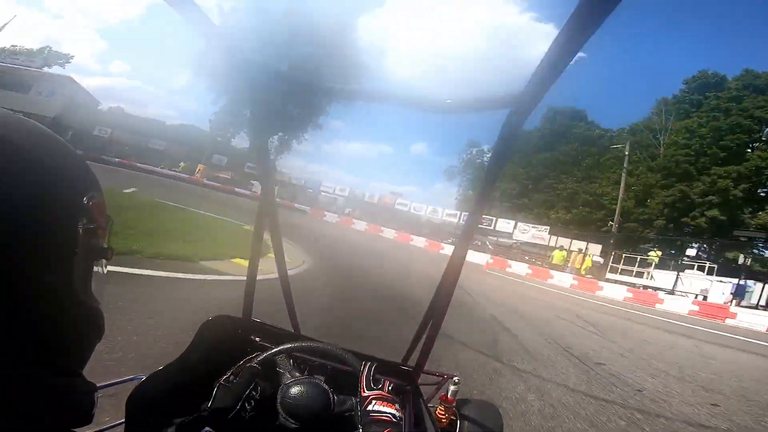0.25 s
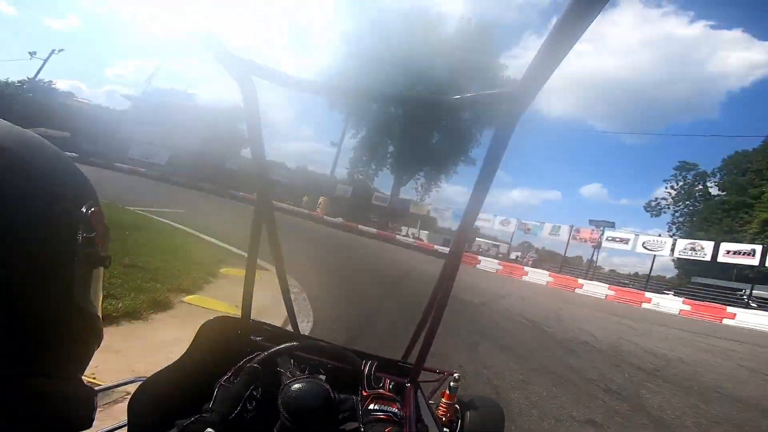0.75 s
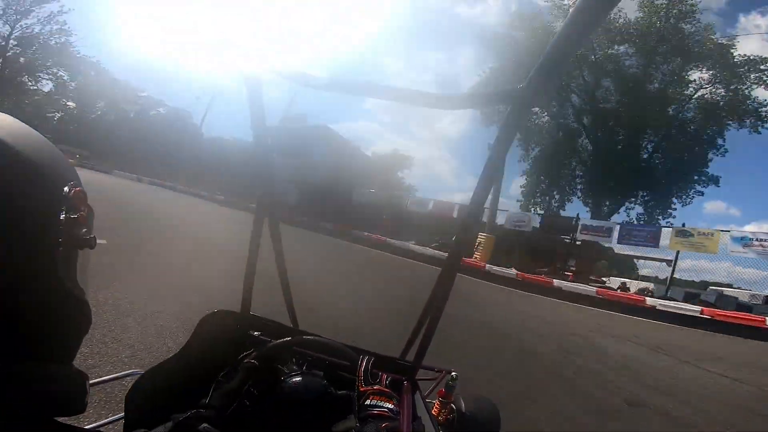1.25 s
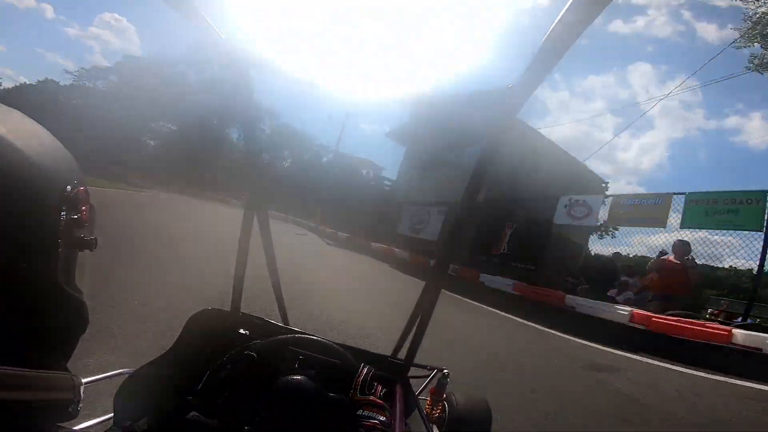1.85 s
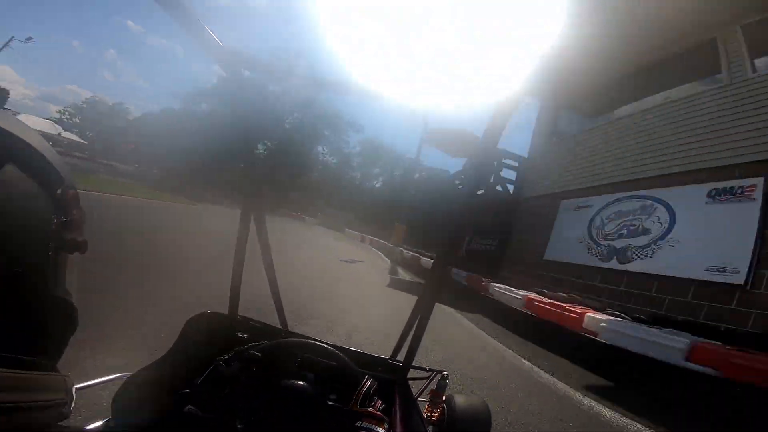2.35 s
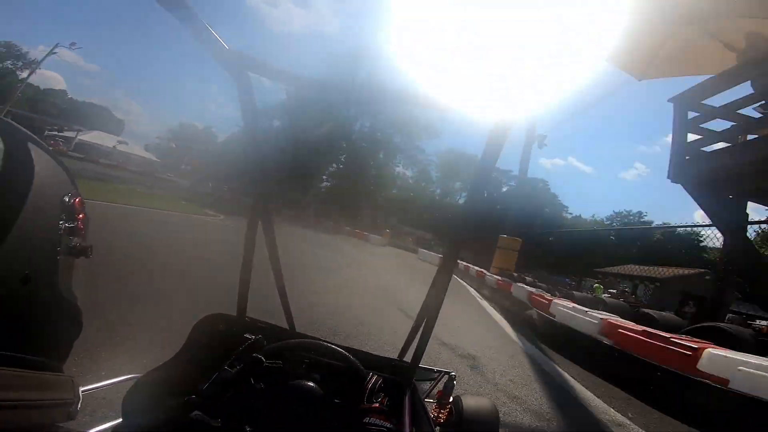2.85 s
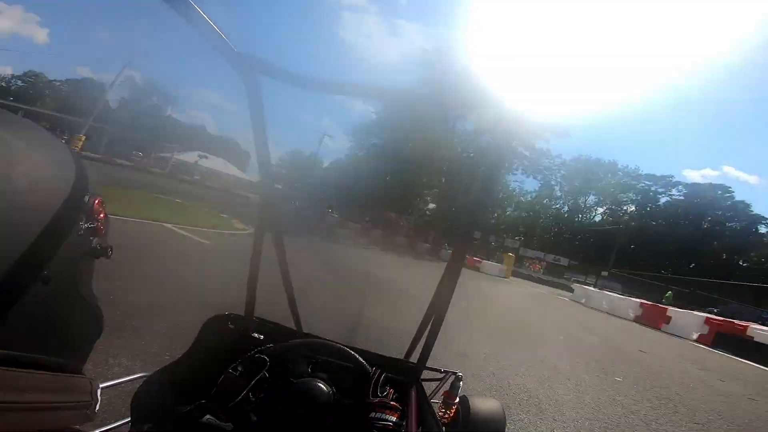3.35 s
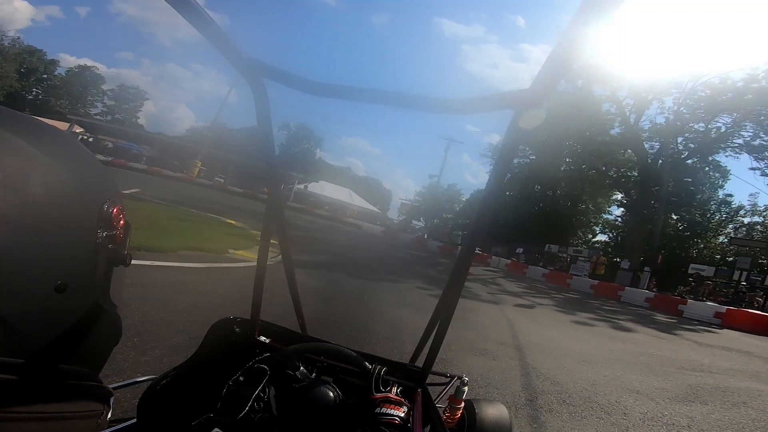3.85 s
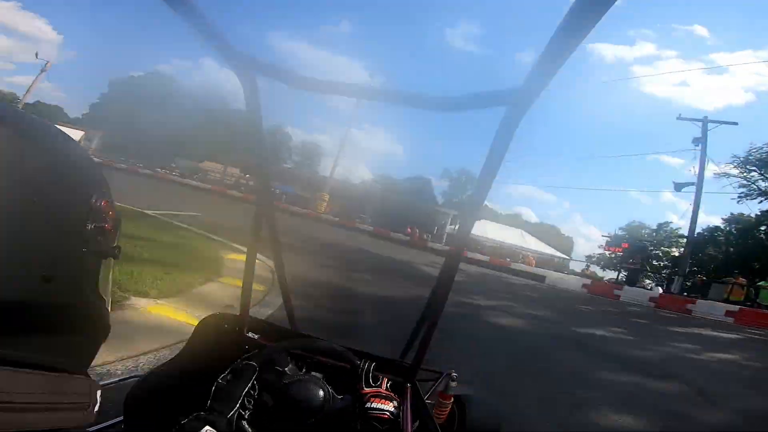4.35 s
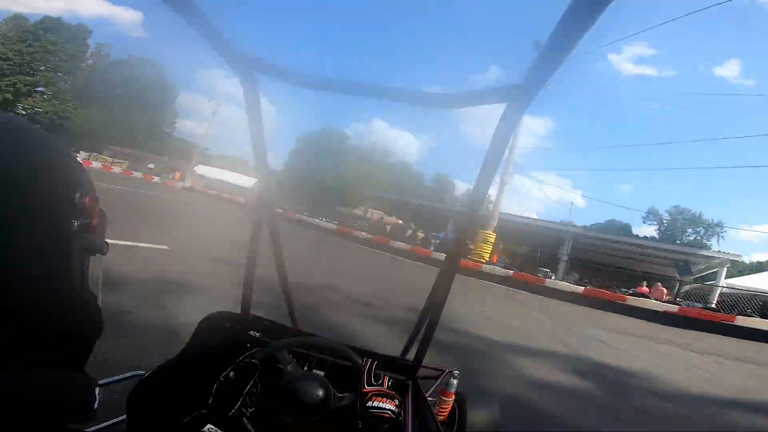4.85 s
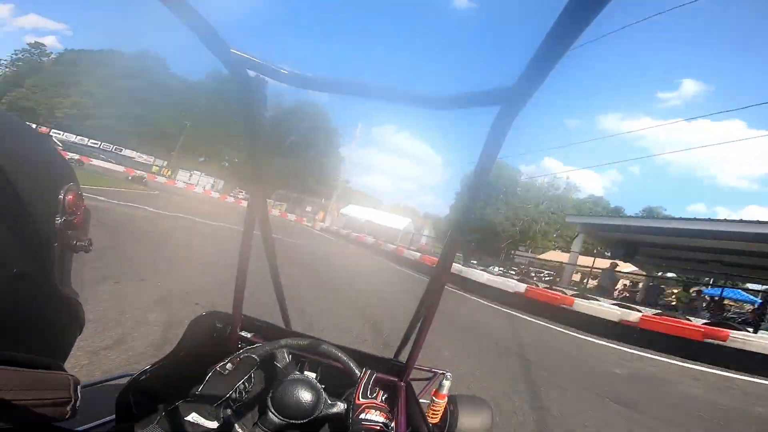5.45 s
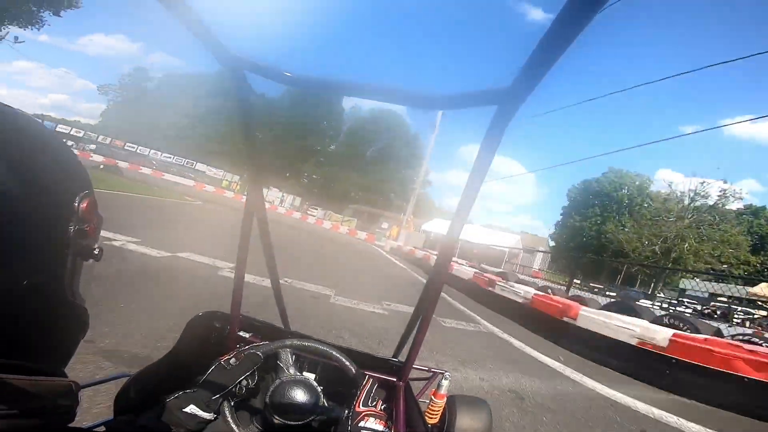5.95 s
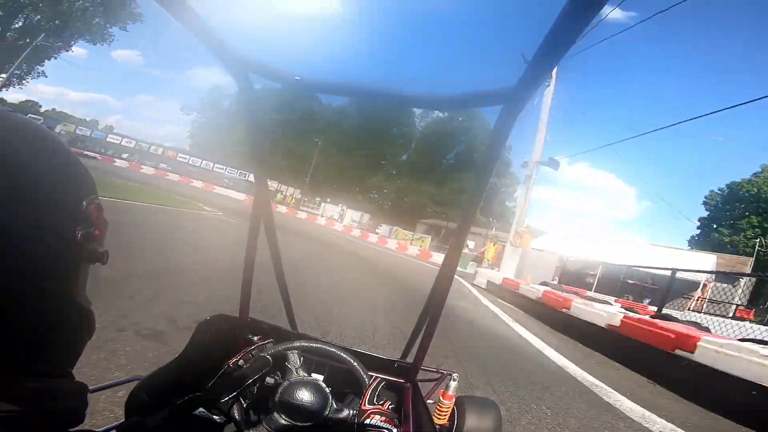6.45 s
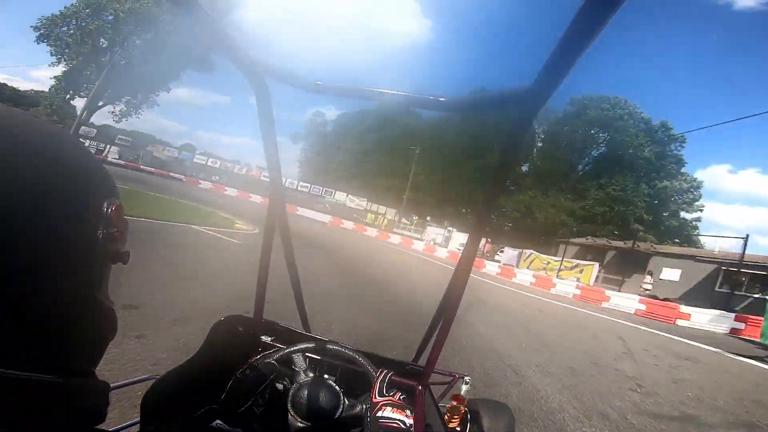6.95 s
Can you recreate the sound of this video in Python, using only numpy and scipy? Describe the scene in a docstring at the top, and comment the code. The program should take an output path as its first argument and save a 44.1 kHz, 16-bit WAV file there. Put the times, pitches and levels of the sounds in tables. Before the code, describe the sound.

A small race car runs flat out around an oval for about seven seconds, heard loud and close from its roll cage. From the first moment the single-cylinder engine makes a deep, booming drone with rapid exhaust cracks. Its pitch is nearly steady, sagging very slightly around 2 and 5.5 seconds and rising a little near 4. The engine surges about six times a second, and each surge swells a metallic clatter of gears, chain and ticking valves. It often stumbles for an instant, sometimes with a pop in the exhaust; the longest stumbles come near 0.7, 3.7, 4.2 and 4.7 seconds. Tiny metallic chirps sit within the engine noise in the first two seconds, and loose metal chatters faintly near 3.8. Wind and tyres rumble underneath, and the engine is still at full speed at the end.

```python
"""On an oval track, at the roll cage of a quarter midget race car lapping flat out.
The four-stroke single booms on its low orders and cracks once a cycle; at top revs it surges
about six times a second. Each surge swells the clatter of valve gear and drive in the metal casing.
In many surges the engine stumbles: a firing fails, and unburnt fuel may pop late in the pipe.
Wind and tyres rumble underneath."""
import sys
import numpy as np
from scipy import signal
from scipy.fft import rfft, irfft
from scipy.io import wavfile

SR = 44100
rng = np.random.default_rng(int(sys.argv[2]) if len(sys.argv) > 2 else 0)


def dump_mix(stems):
    """Bounce the given channels to the path in sys.argv[1] as a 16-bit WAV at rate SR."""
    frames = np.atleast_2d(stems).T  # one column per channel
    limited = np.clip(frames, -1, 1)  # hard clip at full scale
    pcm = np.round(limited * 32767).astype(np.int16)
    wavfile.write(sys.argv[1], SR, pcm)


N = 317961
TIME = np.arange(N) / SR


# low orders of pipe and intake: firing_multiple, rms_db, db_per_firing_hz, db_per_shake_db, flutter_ratio
ENGINE_ORDERS = [(1, -57, 11, 3, 1.2), (2, -14, -0.8, -0.26, 0.17), (3, -25.5, -0.5, -0.5, 0.27),
                 (4, -21, 3, 0.43, 0.31), (5, -36, -3.5, -0.35, 0.45), (6, -50.5, 15.5, 0.5, 1.8),
                 (7, -25, 0.55, 0.68, 0.17), (8, -57.5, 2.5, 0, 6.6), (9, -63, 8.5, 0.8, 7.5),
                 (11, -50, -4, 1.5, 1.1)]
# brief dip of the deep boom: time_s, gain_db
BOOM_DIP = [(4.0, 0), (4.27, -1.5), (4.315, -8), (4.35, -1.5), (4.6, 0)]


def boom(cycles, firing_hz, shake_db, lag_rad=2.042, dispersion_rad=.59, flutter_hz=16):
    """Pipe and intake boom on the low orders; each flutters, and the crank sways as the drive shakes."""
    cycles = cycles - .00021 * shake_db + .0017 * wander(rate_hz=7.4)
    dip_db = along(BOOM_DIP, TIME) + .51 * wander(rate_hz=8.9)
    excess_hz = firing_hz - firing_hz.mean()
    out = np.zeros(N)
    for order, rms_db, db_per_hz, db_per_shake_db, flutter_ratio in ENGINE_ORDERS:
        flutter = 1 + flutter_ratio * (wander(flutter_hz) + 1j * wander(flutter_hz)) / np.sqrt(2)
        phase_rad = 2 * np.pi * order * cycles - lag_rad * order + dispersion_rad * order ** 2
        level_db = rms_db + db_per_hz * excess_hz + db_per_shake_db * shake_db
        if order == 2:  # crank rate: the deep boom
            level_db += dip_db
        if order == 4:  # its octave swells as it dips
            level_db -= .31 * dip_db
        out += amp(level_db) * np.sqrt(2) * (flutter * np.exp(1j * phase_rad)).real
    return out


# pressure pulse spectrum: freq_hz, gain_db
PULSE_SPECTRUM = [(150, -21.5), (330, -7.5), (480, 1), (650, 1), (850, -4.5), (1050, 2), (1500, -4.5),
                  (2050, 1), (2500, -20), (3400, -17), (4000, -30.5), (6700, -31.5), (9000, -43),
                  (15000, -68)]
# gas jet spectrum: freq_hz, gain_db
JET_SPECTRUM = [(200, -32), (550, 7), (850, 1), (1350, -18.5), (2050, -7), (2550, -14.5), (3300, -8.5),
                (4400, -17.5), (5900, -21), (6700, -13.5), (9100, -26.5), (10000, -19.5), (11800, -38.5),
                (14500, -39)]


def exhaust(firings_s, shake_db, pulse_db=-25, jet_db=-34, pop_db=-1, pop_delay_cycles=.52):
    """Each firing or late pop sends a pressure wave and a short jet of gas down the pipe."""
    jitter_s, suction_s, rebound_s = .00012, .00085, .0013
    firing_db, pops = combustion(firings_s, shake_db)
    pops_s = firings_s[:-1] + pop_delay_cycles * np.diff(firings_s)
    times_s = np.r_[firings_s + jitter_s * rng.standard_normal(len(firings_s)), pops_s]
    sizes = np.r_[amp(firing_db), amp(pop_db) * pops[:-1]]
    push = clicks(times_s, sizes)
    # the push returns from the open end as suction, then rebounds
    wave = .5 * push - clicks(times_s + suction_s, sizes) + .5 * clicks(times_s + rebound_s, sizes)
    jet = decay(push, decay_s=.0013) * rng.standard_normal(N)
    return coloured(wave, PULSE_SPECTRUM, pulse_db) + coloured(jet, JET_SPECTRUM, jet_db)


# stumbles and hard shakes: start_s, missed_firings, shake_peak_db, pop_cycle
# pop_cycle: 0 = no pop, 1 = last missed cycle, 2 = the cycle that fires next, and so on
STUMBLE_EVENTS = [(.013, 0, 5, 3), (.217, 1, 1, 1), (.345, 0, 3.5, 2), (.523, 1, 3, 0), (.675, 2, 5, 2),
                  (.828, 1, 0, 0), (1.006, 1, 3.5, 4), (1.158, 1, 2.5, 0), (1.235, 1, -1, 1),
                  (1.312, 1, 1, 2), (1.518, 1, 4.5, 4), (1.655, 0, 5.5, 0), (1.7, 1, 3, 0),
                  (1.857, 1, 4, 4), (2.092, 1, 1.5, 1), (2.407, 1, 5, 0), (2.465, 0, 4.5, 5),
                  (2.773, 1, 4, 0), (2.903, 1, 2, 2), (3.188, 0, 0, 2), (3.393, 1, 2, 2), (3.674, 3, 5, 2),
                  (3.852, 1, 3, 0), (4.13, 1, 1, 1), (4.181, 3, 6.5, 0), (4.382, 1, 4, 0), (4.56, 1, 1, 1),
                  (4.655, 0, 3.5, 2), (4.713, 2, 5, 1), (4.79, 0, -1, 2), (5.047, 1, 2.5, 1),
                  (5.215, 0, 3.5, 0), (5.41, 1, 0, 0), (5.594, 1, 4, 0), (5.968, 0, 4.5, 2),
                  (6.09, 1, 1.5, 1), (6.377, 1, 1, 2), (6.533, 1, -1, 0), (6.65, 0, 4.5, 0),
                  (6.715, 1, 6, 2), (7.102, 1, 0, 2)]


def combustion(firings_s, shake_db, miss_db=-15, catch_db=1, fade_db_per_db=.22, fade_lead_s=.02):
    """Firings fade as a surge builds, may fail, then catch harder; unburnt fuel pops in the pipe."""
    count = len(firings_s)
    fade_db = fade_db_per_db * np.interp(firings_s + fade_lead_s, TIME, shake_db)
    firing_db = .45 * rng.standard_normal(count) - fade_db
    stray_pop_db = -23 + 12 * rng.standard_normal(count)
    pops = np.minimum(amp(stray_pop_db), .5)
    for start_s, missed, _, pop_cycle in STUMBLE_EVENTS:
        first = np.argmin(abs(firings_s - start_s))
        caught = first + missed
        if missed:
            firing_db[first:caught] = miss_db
            firing_db[caught] += catch_db
        if pop_cycle:
            pops[caught + pop_cycle - 2] = 1
    return firing_db, pops


def shake(firing_hz, surges_per_s=6.3, surge_db=2.5, build_db_per_s=99, settle_db_per_s=114):
    """Drive shake in dB: a surge peaks at each stumble, and evenly paced ones fill the gaps."""
    lag_s, lag_per_miss_s = .001, .016
    calm_db, calm_db_per_hz = -1, -2
    start_s, missed, stumble_db, _ = np.transpose(STUMBLE_EVENTS)
    peaks_s = start_s + lag_s + lag_per_miss_s * missed
    surges = list(zip(peaks_s, stumble_db))
    for from_s, to_s in zip(peaks_s, peaks_s[1:]):
        steps = round((to_s - from_s) * surges_per_s)
        surges += [(peak_s, surge_db) for peak_s in np.linspace(from_s, to_s, steps + 1)[1:-1]]
    shake_db = calm_db + calm_db_per_hz * (firing_hz - firing_hz.mean())
    for peak_s, peak_db in surges:
        drop_db = np.maximum(build_db_per_s * (peak_s - TIME), settle_db_per_s * (TIME - peak_s))
        shake_db = np.maximum(shake_db, peak_db - drop_db)
    return shake_db + 1.1 * wander(rate_hz=46)


# broad casing response: freq_hz, gain_db
CASING_SPECTRUM = [(150, -30), (350, -10), (650, -2.5), (860, -13.5), (1250, -4.5), (1500, -2.5), (2080, 6),
                   (2600, -8.5), (3800, -12.5), (4400, -23), (7800, -28), (10800, -29), (11900, -56),
                   (14500, -58)]
# casing resonances and one notch: centre_hz, width_hz, gain_db
CASING_RINGS = [(1012, 210, 15), (1336, 128, 11), (1541, 193, 10.5), (2882, 66, 7.5), (3285, 64, 10.5),
                (4860, 180, 12.5), (5410, 340, 8.5), (6520, 84, 13), (9150, 390, -16), (9200, 400, 9.5),
                (12300, 700, 12)]


def clatter(cycles, shake_db, knock_db=-28, rattle_db=-25.5, teeth=40, jitter_s=.00004):
    """Gear teeth knock in the same pattern every cycle, the chain rattles; both ring the casing."""
    cycle_starts = np.arange(-1, cycles[-1])[:, None]
    tooth_phases = (np.arange(teeth) + rng.random(teeth)) / teeth
    times_s = np.interp(cycle_starts + tooth_phases, cycles, TIME, left=-1, right=-1)
    times_s += jitter_s * rng.standard_normal(times_s.shape)
    sizes = rng.choice([-1, 1], teeth) * amp(2 * rng.standard_normal(times_s.shape))
    knocks = clicks(times_s.ravel(), sizes.ravel())
    rattle = grains(per_s=7000, spread_db=2)
    force = amp(1.15 * shake_db + .15 * along(VALVE_CYCLE, cycles % 1))  # harder while valves move
    gears = coloured(knocks * force, CASING_SPECTRUM, knock_db, CASING_RINGS)
    chain = coloured(rattle * force, CASING_SPECTRUM, rattle_db, CASING_RINGS)
    return gears + chain


# hollow intake resonance: freq_hz, gain_db
AIRBOX_SPECTRUM = [(100, -38), (230, -6.5), (290, -7.5), (350, -12), (450, -23.5), (1000, -71.5),
                   (4000, -109)]


def intake(cycles, shake_db, level_db=-31, centre_cycles=.47, width_cycles=.19):
    """A hollow gulp of air once a cycle, louder as the drive shakes."""
    stroke = np.exp(-((cycles % 1 - centre_cycles) / width_cycles) ** 2)
    gulps = stroke * amp(1.6 * shake_db) * rng.standard_normal(N)
    return coloured(gulps, AIRBOX_SPECTRUM, level_db)


# valve train activity over one cycle: phase_cycles, gain_db
VALVE_CYCLE = [(0, -8), (.12, 6), (.2, -7), (.3, -5), (.37, 4), (.45, 10.5), (.53, -29), (.61, 4),
               (.72, -9), (.83, -1.5), (.91, 6), (1, -17)]
# valve tick spectrum: freq_hz, gain_db
TICK_SPECTRUM = [(1500, -25), (3400, 10), (4400, -4.5), (5000, 6.5), (6200, -11), (6700, -11), (8200, -3),
                 (9200, -11.5), (10000, 0.5), (10900, -7.5), (11900, -27), (13800, -17), (15000, -47)]


def valves(cycles, shake_db, level_db=-44.5):
    """Bright ticking as the valves lift and seat."""
    force = amp(along(VALVE_CYCLE, cycles % 1) + shake_db)
    return coloured(grains(per_s=6000, spread_db=3) * force, TICK_SPECTRUM, level_db)


# hardest jolts to the frame: start_s, gain_db
JOLTS = [(1.683, 0), (1.906, 0), (3.752, 2), (3.761, 4), (3.772, 4), (3.776, 7), (4.232, 1), (6.723, 2)]
# loose metal spectrum: freq_hz, gain_db
CHATTER_SPECTRUM = [(400, -12), (1500, 0), (3300, -6), (5000, -13), (8000, -18), (10500, -18), (12000, -35),
                    (15000, -38)]


def chassis(gain_db=-41.5, decay_s=.0018):
    """Loose metal on the frame chatters briefly at each jolt."""
    start_s, jolt_db = np.transpose(JOLTS)
    envelope = decay(clicks(start_s, amp(jolt_db)), decay_s) * np.sqrt(SR * decay_s)
    return envelope * coloured(rng.standard_normal(N), CHATTER_SPECTRUM, gain_db)


# metallic chirps: centre_s, pitch_hz, peak_db
METAL_CHIRPS = [(.37, 1320, -18), (.71, 1330, -18), (1.55, 1300, -17)]


def chirps(half_width_s=.0083, waver_hz=25):
    """Short, wavering metallic tones."""
    drift_hz = waver_hz * wander(rate_hz=54)
    out = np.zeros(N)
    for centre_s, pitch_hz, peak_db in METAL_CHIRPS:
        envelope = amp(peak_db) * np.exp(-((TIME - centre_s) / half_width_s) ** 2)
        out += envelope * np.sin(2 * np.pi * np.cumsum(pitch_hz + drift_hz) / SR)
    return out


# wind and tyre spectrum: freq_hz, gain_db
ROAD_SPECTRUM = [(10, -37), (25, -5), (55, 2), (75, -26), (92, 13), (115, -7.5), (200, -19), (310, -8.5),
                 (450, -10.5), (1000, -9.5), (4000, -48), (15000, -51)]


def road(shake_db, level_db=-32):
    """Wind and tyres rumble through the frame, swelling slightly with the shake."""
    rumble = coloured(rng.standard_normal(N), ROAD_SPECTRUM)
    return amp(level_db) * unit(rumble * amp(.26 * shake_db))


def amp(db):
    """Decibels to gain."""
    return 10 ** (np.asarray(db) / 20)


def unit(x):
    """Scales to rms 1."""
    return x / np.sqrt(np.mean(abs(x) ** 2) + 1e-20)


def along(rows, at):
    """Linear interpolation of (position, value) rows."""
    return np.interp(at, *np.transpose(rows))


def wander(rate_hz):
    """Random drift of rms 1, up to about rate_hz."""
    freq_hz = np.fft.rfftfreq(N, 1 / SR)
    return unit(irfft(rfft(rng.standard_normal(N)) / (1 + (freq_hz / rate_hz) ** 4), N))


def coloured(x, spectrum, rms_db=0, rings=(), fft_size=4096):
    """Minimum-phase filter that rings after each click; output scaled to rms_db."""
    freq_hz = abs(np.fft.fftfreq(fft_size, 1 / SR))
    points_hz, points_db = np.transpose(spectrum)
    gain_db = np.interp(np.log(freq_hz + 1), np.log(points_hz), points_db)
    for centre_hz, width_hz, ring_db in rings:
        gain_db += ring_db / (1 + (2 * (freq_hz - centre_hz) / width_hz) ** 2)
    log_response = np.conj(signal.hilbert(np.log(amp(gain_db))))
    impulse = np.fft.ifft(np.exp(log_response)).real[:fft_size // 2]
    return amp(rms_db) * unit(signal.oaconvolve(x, impulse)[:N])


def clicks(times_s, sizes):
    """Train of one-sample clicks."""
    train = np.zeros(N)
    inside = (times_s >= 0) & (times_s < TIME[-1])
    np.add.at(train, np.round(times_s[inside] * SR).astype(int), sizes[inside])
    return train


def decay(train, decay_s):
    """Gives each click an exponential tail."""
    return signal.lfilter([1], [1, -np.exp(-1 / (decay_s * SR))], train)


def grains(per_s, spread_db):
    """Random impacts of uneven size."""
    sizes = rng.standard_normal(N) * amp(spread_db * np.clip(rng.standard_normal(N), -2, 2))
    return sizes * (rng.random(N) < per_s / SR)


# engine speed, climbing and sagging with the lap: time_s, firing_hz
ENGINE_SPEED = [(0, 39.21), (1.05, 39.37), (1.85, 38.14), (2.3, 38.13), (3, 38.57), (3.5, 39.13),
                (4.25, 39.75), (4.8, 39.01), (5.45, 38.21), (6.15, 38.315), (7.21, 38.87)]


def scene(first_firing_cycles=.517, pipe_delay_cycles=.053):
    """One crankshaft times the engine's gas and metal sounds, over the road rumble."""
    firing_hz = along(ENGINE_SPEED, TIME)
    shake_db = shake(firing_hz)
    cycles = np.cumsum(firing_hz) / SR - first_firing_cycles
    firings_s = np.interp(np.arange(0, cycles[-1]), cycles, TIME)
    low_orders = boom(cycles - pipe_delay_cycles, firing_hz, shake_db)
    gas = low_orders + exhaust(firings_s, shake_db) + intake(cycles, shake_db)
    metal = clatter(cycles, shake_db) + valves(cycles, shake_db) + chassis() + chirps()
    return (gas + metal + road(shake_db))[None]


def record(dry, cutoff_hz=14900):
    """Steep low-pass on the top treble."""
    lowpass = signal.firwin(301, cutoff_hz, window=("kaiser", 9), fs=SR)
    return signal.oaconvolve(dry, lowpass[None], "same")


dry = scene()
out = record(dry)
dump_mix(out)
```